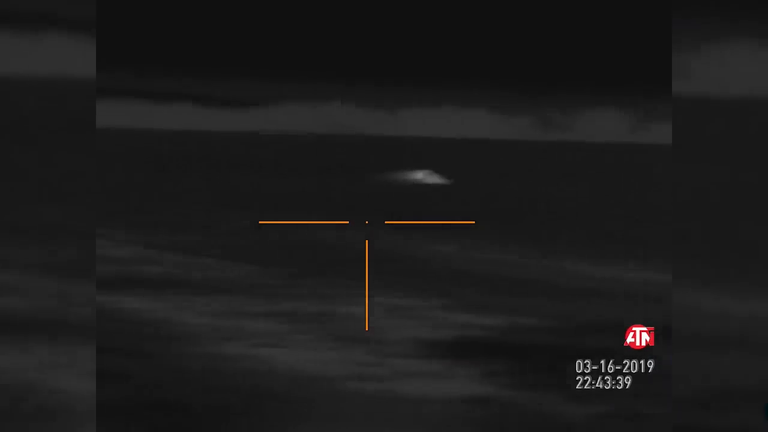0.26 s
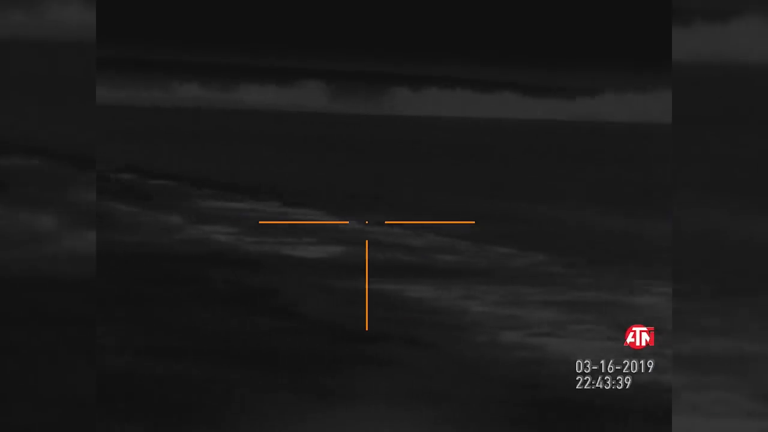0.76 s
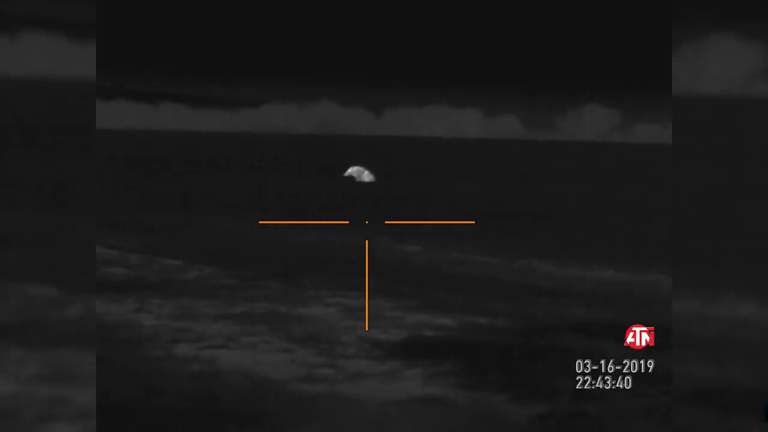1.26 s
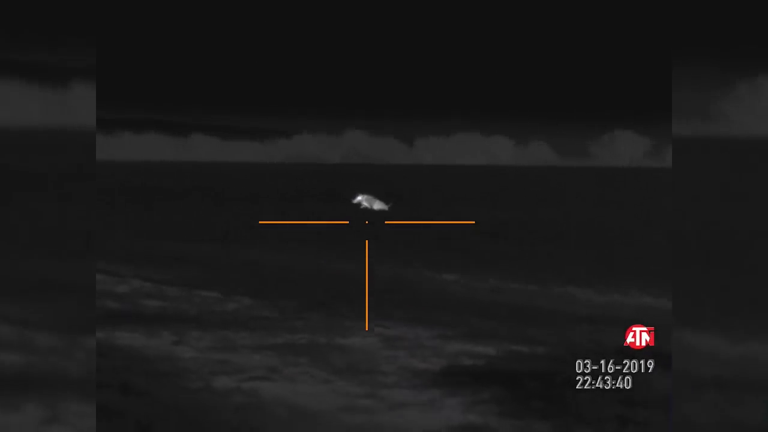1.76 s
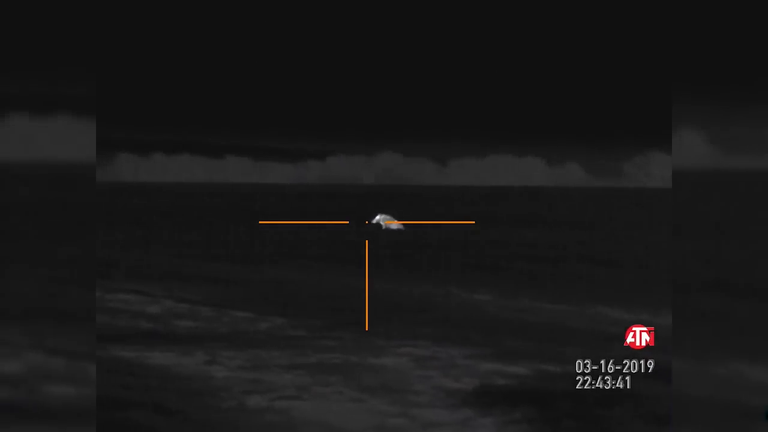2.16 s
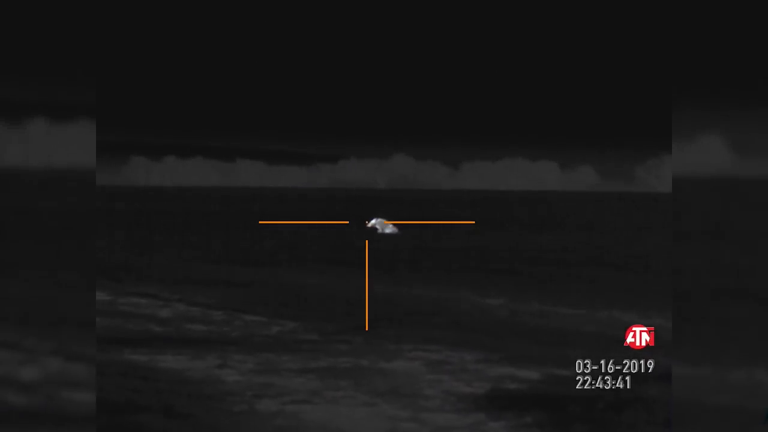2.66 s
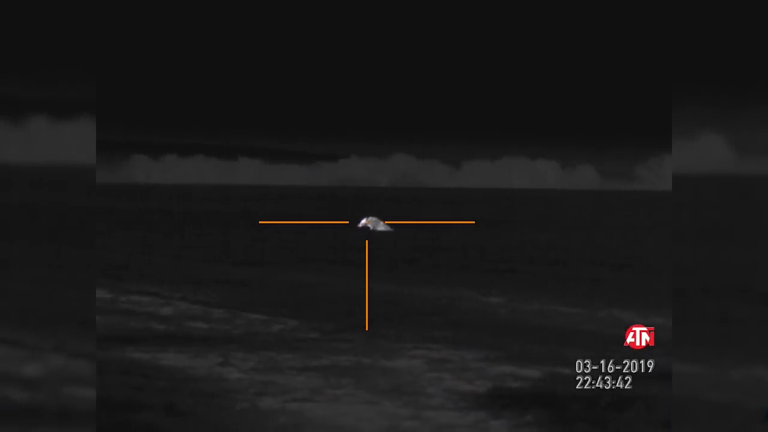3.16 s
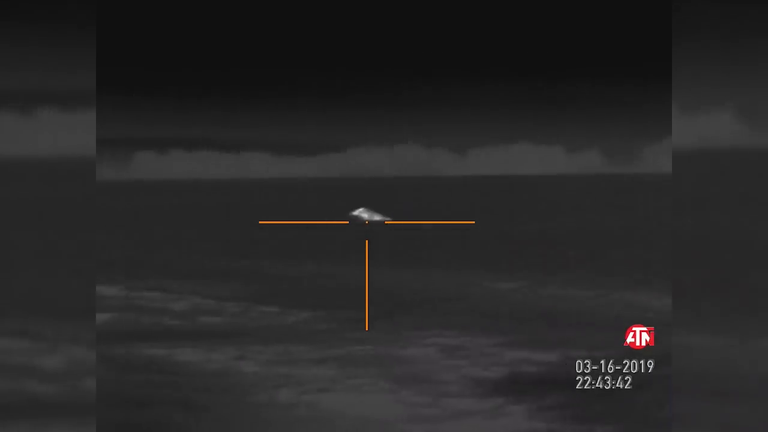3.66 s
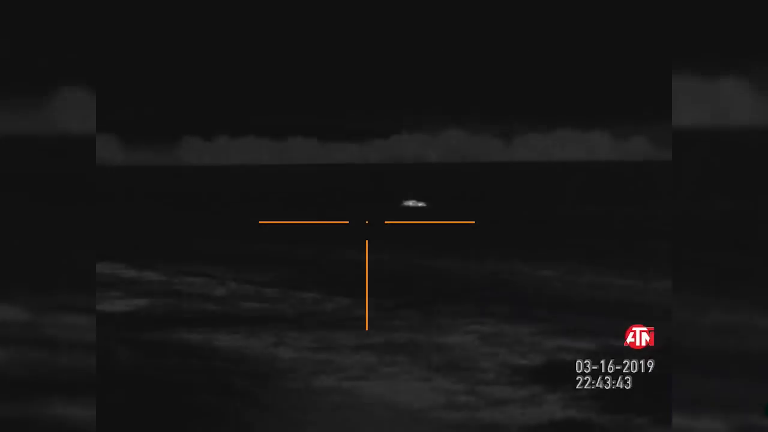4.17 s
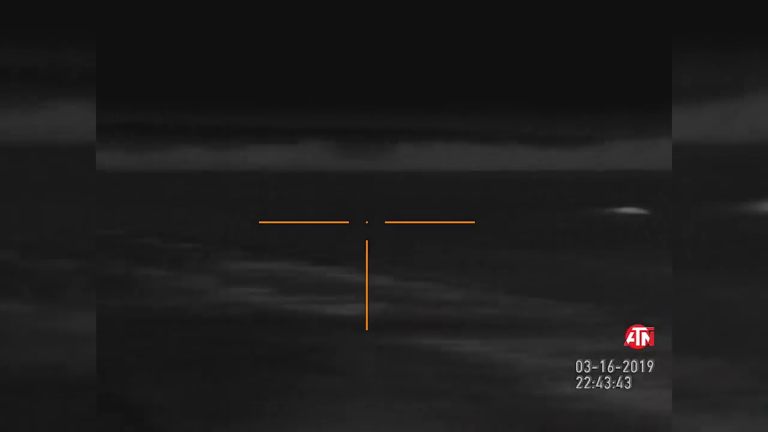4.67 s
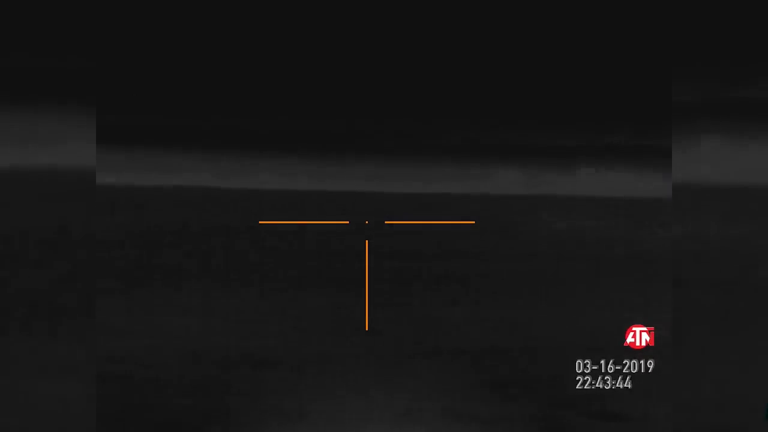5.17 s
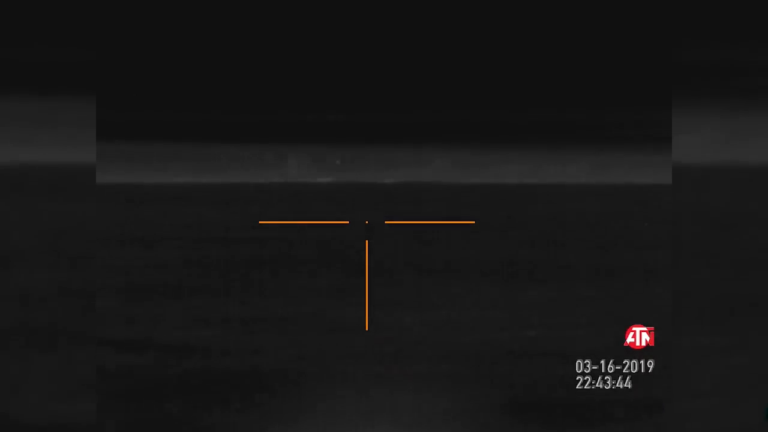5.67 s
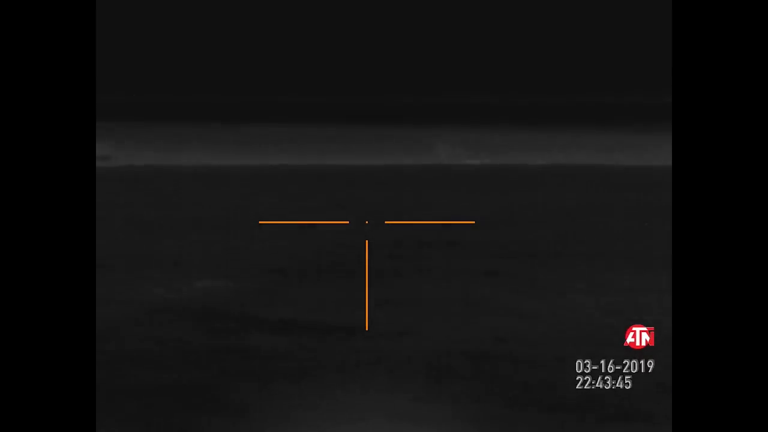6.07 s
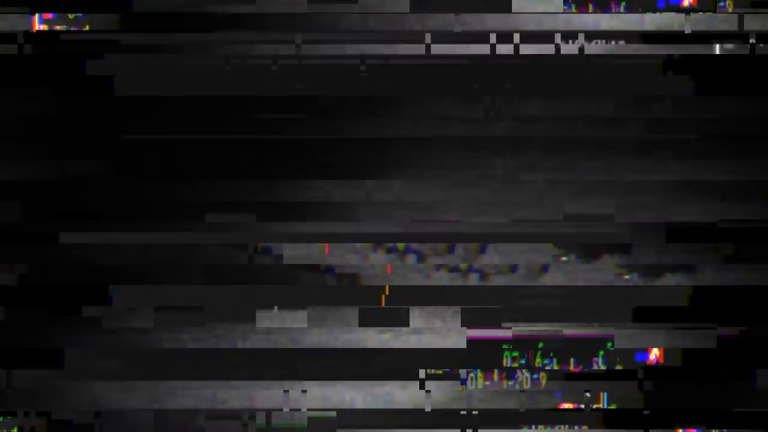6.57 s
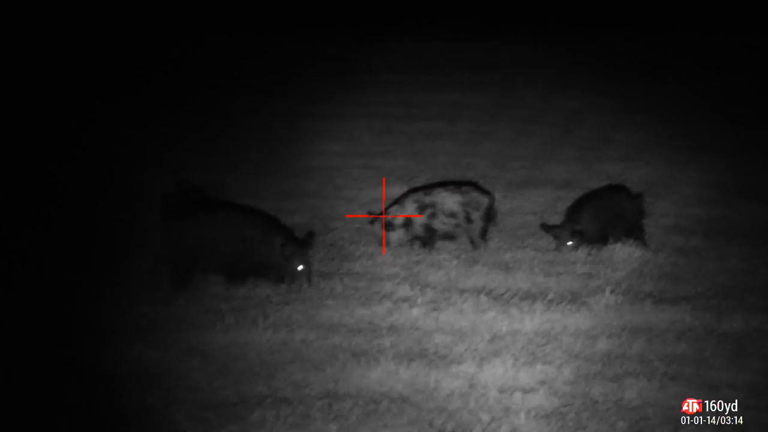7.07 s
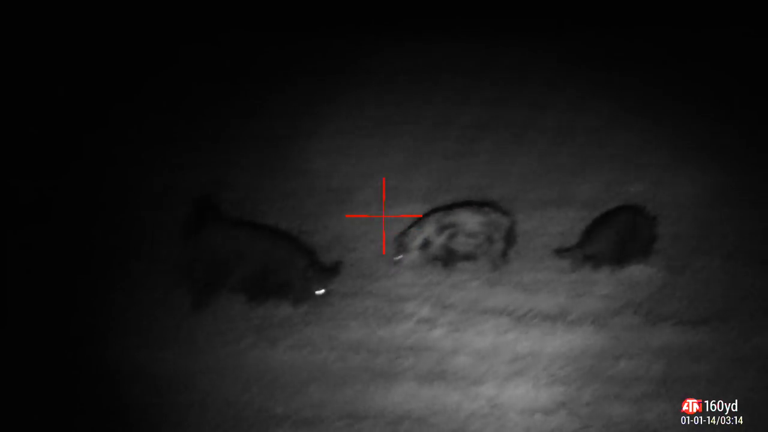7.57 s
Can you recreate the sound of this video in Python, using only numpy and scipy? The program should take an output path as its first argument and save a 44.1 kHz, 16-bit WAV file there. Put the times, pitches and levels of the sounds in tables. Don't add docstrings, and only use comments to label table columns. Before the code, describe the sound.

A small microphone on a rifle, quiet open fields at night, nearly mono. From 0 s there is low far hum, faint electronic whine and hiss, soft cloth and finger ticks, with a crisp tick at 0.6. At 2.0-2.12 the safety lever is taken up and snaps over, hard and metallic; another small tick at 3.13. At 3.43 the hammer falls and a suppressed blast overloads the input, very short, with bolt clatter slamming shut by 3.48 and unsteady ringing steel. A bright hissing scatter swells around 3.6 and sags until the bullet strikes at 3.82: sharp crack, dirt spray, small thud, then a tail growing dull to about 5. Handling ticks and cloth continue to 5.5. At 6.15, after a tiny gap, a hollow hard knock opens a much louder hum with thin high hiss, quick cloth brushes near 6.26, sharp ticks at 7.13 and 7.2, and softer contacts until 7.8.

```python
import sys
import numpy as np
from scipy import signal
from scipy.io import wavfile
from scipy.ndimage import uniform_filter1d

SR = 44100
rng = np.random.default_rng(int(sys.argv[2]) if len(sys.argv) > 2 else 0)


def makeup_ratio(level_db):
    decades = np.asarray(level_db, float) / 20
    return 10 ** decades


def to_wav(sig):
    pcm = np.clip(np.atleast_2d(sig), -1, 1) * 32767
    pcm = np.round(pcm).astype(np.int16)
    wavfile.write(sys.argv[1], SR, pcm.T)


N = 344871
TIME = np.arange(N) / SR
IMPACT_S, CRACK_S = 3.8165, .0003

# start in seconds, level in dB, t60 in seconds.
MUZZLE_BLAST = (3.4318, 26, .0175)


def rms_one(x):
    return x / np.sqrt(np.mean(x ** 2) + 1e-20)


def in_time(rows):
    s, *columns = np.transpose(rows)
    return [np.interp(TIME, s, c) for c in columns]


def drift(rate, size):
    r, steps = np.exp(-80 * np.pi * rate / SR), size // 40 + 2
    slow = signal.lfilter([1], [1, -2 * r, r * r], rng.standard_normal(steps + 2000))
    return np.interp(np.linspace(0, steps - 1, size), np.arange(steps), rms_one(slow)[-steps:])


def ring(x, hz, t60):
    r, w = makeup_ratio(-60 / (t60 * SR)), 2 * np.pi * hz / SR
    return signal.lfilter([0, np.sin(w)], [1, -2 * r * np.cos(w), r * r], x + 1e-18)


def dying(s, t60):
    return (TIME >= s) * makeup_ratio(-60 * np.maximum(TIME - s, 0) / t60)


def noise(spectrum, span, patchy_db, tilt_db=0):
    spans = {"first": (0, 6.14), "blast": (3.3, 3.6), "flight": (3.435, 3.9), "field": (3.7, 5.05),
             "second": (6.0, 7.83)}
    band_edges = 20 * 2 ** np.arange(0, 10, .5)
    hz_points, db_points = np.transpose(spectrum)
    start, stop = (min(round(s * SR), N) for s in spans[span])
    size = stop - start
    tilt_db = (tilt_db + np.zeros(N))[start:stop]
    total, together, white = 0, drift(34.0, size), rng.standard_normal((2, size))
    for k, (low, high) in enumerate(zip(band_edges, band_edges[1:])):
        hz = np.sqrt(low * high)
        level = np.interp(np.log(hz), np.log(hz_points), db_points, left=-90, right=-90)
        band = signal.sosfilt(signal.butter(2, [low, high], "band", fs=SR, output="sos"), white[k % 2])
        flicker_db = patchy_db * (0.58 * together + drift(26, size))
        sway_db = tilt_db * np.log2(hz / 4000) + flicker_db
        total = total + band * makeup_ratio(level + sway_db)
    evened = total / np.sqrt(uniform_filter1d(total ** 2, size=SR // 3))
    return np.pad(evened, (start, N - stop))


def strokes(events, rest_db, edge):
    s, db, fade = np.transpose(events)[:, :, None]
    age = (TIME - s) / fade
    shape = np.exp(-np.maximum(-age / 0.76, age) ** edge)
    return makeup_ratio(rest_db) + np.sum(makeup_ratio(db) * shape, axis=0)


def night(span, hum, hum_colour, brush, brush_colour, patchy_db):
    far = makeup_ratio(in_time(hum)[0]) * noise(hum_colour, span, patchy_db=-0.37)
    return far + brush * noise(brush_colour, span, patchy_db)


def tones(lines):
    return sum(makeup_ratio(db + 2.5) * np.sin(2 * np.pi * hz * TIME) for hz, db in lines)


def first_air():
    # time in seconds, level in dB.
    far_hum = [(0, -68.5), (.66, -66.5), (1.0, -69.5), (3.2, -70), (3.41, -68.5), (4.88, -70.5),
               (5.42, -69.5), (6.13, -74)]
    # pitch in Hz, level in dB per Hz.
    hum_colour = [(12, -46), (20, -15), (81, -10), (250, -6), (409, -5), (706, 0.27), (1220, -1.8),
                  (1500, -5.5), (1900, -22), (2400, -24.5), (3000, -23.5), (3900, -42)]
    # peak in seconds, level in dB, fade in seconds.
    cloth = [(.09, -75, 0.034), (.27, -70, 0.088), (.6, -70, 0.26), (1.55, -78, .05), (1.85, -72, .06),
             (2.08, -68.5, 0.093), (2.4, -77, 0.1), (3.4, -76, .4), (4.42, -71.5, .12), (4.62, -69.5, 0.14),
             (4.9, -64.5, 0.063), (5.15, -69.5, .15), (5.55, -71, 0.31)]
    # pitch in Hz, level in dB per Hz.
    cloth_colour = [(1500, -16.5), (2400, -7.5), (4000, -7), (6120, -5.5), (7500, -3), (11000, -10),
                    (15400, -15)]
    # pitch in Hz, level in dB.
    whine = [(81, -91.5), (122, -91), (721, -87), (1441, -84), (2160, -86.5), (2880, -90.5), (8258, -90),
             (10142, -92)]
    brush = strokes(cloth, rest_db=-86, edge=1.2)
    air = night("first", far_hum, hum_colour, brush, cloth_colour, patchy_db=1.8)
    return air + tones(whine) + makeup_ratio(-73) * rng.standard_normal(N)


def bumps():
    # start in seconds, level in dB, pitch in Hz.
    knocks = [
        (0.096, -62, 130),
        (4.916, -62, 110),
    ]
    return sum(makeup_ratio(db) * dying(s, 0.041) * np.sin(2 * np.pi * hz * (TIME - s)) for s, db, hz in knocks)


def contacts(events, modes, octaves, ring_db, thump_db, order):
    out, size = np.zeros(N + SR), SR // 10
    age = np.arange(size) / SR
    rise = np.clip(age / 0.0001, 0, 1)
    jolt = makeup_ratio(thump_db) * np.sin(np.pi * np.clip(age / 0.00036, 0, 1))
    for s, peak_db, hz, t60 in events:
        burst = rng.standard_normal(size) * rise * makeup_ratio(-68 * age / t60)
        strength = rng.normal(0, 2.5, len(modes))
        edges = np.clip(hz * 2 ** (octaves * np.array([-.5, .5])), 100, 19000)
        snap = signal.lfilter(*signal.butter(order, edges, "band", fs=SR), burst)
        snap = signal.lfilter(*signal.butter(1, edges[0] / 4, "high", fs=SR), snap)
        body = sum(makeup_ratio(db + g) * ring(snap, f, d) * f / 8000 for (f, db, d), g in zip(modes, strength))
        touch, at = snap + makeup_ratio(ring_db - 9.5) * body, round(s * SR)
        out[at:at + size] += makeup_ratio(peak_db) * (touch / np.abs(touch).max() + jolt)
    return out[:N]


def gun():
    # start in seconds, peak in dB, pitch in Hz, t60 in seconds.
    fidgets = [(.215, -52, 6500, .012), (.229, -53, 5500, .009), (.258, -55, 9000, .01),
               (.279, -62, 8100, .01), (.29, -49, 1200, .013), (.357, -51, 900, .01), (.7, -51, 1700, .015),
               (2.272, -50.5, 1970, 0.063), (4.0609, -48.5, 4600, 0.017), (4.615, -48.5, 1970, 0.22),
               (4.7499, -48, 3210, .02), (4.861, -51.5, 2300, 0.011), (4.9629, -50.5, 3980, 0.027),
               (4.97, -46, 1467, 0.014), (5.0487, -51, 5000, 0.0081)]
    # start in seconds, peak in dB, pitch in Hz, t60 in seconds.
    ticks = [(.5842, -29, 7760, 0.0094), (.59, -43, 8020, 0.034), (3.1346, -27, 8800, .0042),
             (3.5408, -18, 2950, 0.011), (4.2177, -44.5, 4060, .013), (4.3514, -40.5, 1890, 0.011),
             (4.57, -61, 4100, .012), (4.9761, -41, 5350, 0.00677), (5.1637, -30.5, 5650, 0.0072),
             (5.1931, -30.5, 5460, 0.0071), (5.2583, -54, 5860, .019), (5.4612, -31.5, 6100, 0.006)]
    # start in seconds, peak in dB, pitch in Hz, t60 in seconds.
    safety = [(2.0151, -35.5, 4900, .016), (2.0169, -41, 5030, 0.01), (2.0331, -49.5, 3270, 0.0081),
              (2.0924, -25.5, 6100, 0.0048), (2.1025, -30.5, 5195, 0.0091), (2.1079, -22.5, 5000, .02),
              (2.1091, -31.5, 4130, 0.055), (2.1172, -7.5, 7500, 0.0098), (2.1248, -11.5, 5600, 0.011),
              (2.2943, -38, 3700, 0.019), (2.5793, -50, 5250, 0.009), (4.6732, -44, 3900, 0.014),
              (4.6798, -32.5, 4500, 0.025)]
    # start in seconds, peak in dB, pitch in Hz, t60 in seconds.
    action = [
        (3.4276, -11.5, 3278, .015),
        (3.443, -10, 7750, 0.019),
        (3.4478, -4.5, 3460, .025),
        (3.4553, -9.5, 5220, .015),
        (3.470, -16, 4106, .03),
        (3.4785, -13.5, 4948, .07),
        (3.4815, -1.5, 4079, 0.025),
    ]
    # start in seconds, peak in dB, pitch in Hz, t60 in seconds.
    pings = [
        (3.4287, -2, 2400, .06),
        (3.4835, -14.5, 5500, .03),
        (3.494, -24.5, 2400, .015),
    ]
    # pitch in Hz, level in dB, t60 in seconds.
    receiver = [(2400, -11, 0.07), (4090, -5.7, 0.0029), (5500, -12, .011), (6960, -6.5, 0.008),
                (10800, -13.5, 0.0034)]
    # pitch in Hz, level in dB, t60 in seconds.
    lever = [(1100, -1, .012), (2400, -10, .025), (2360, -32, .13), (4010, -0.5, .012),
             (3900, -37.5, 0.094), (6100, -2, 0.0038), (9300, -10.5, .005)]
    return (contacts(fidgets, receiver, octaves=1.2, ring_db=-28, thump_db=-21.0, order=1)
            + contacts(ticks, receiver, octaves=0.93, ring_db=-24.5, thump_db=-26.5, order=1)
            + contacts(safety, lever, octaves=1.0, ring_db=-4, thump_db=-25.5, order=1)
            + contacts(action, receiver, octaves=3.3, ring_db=-11, thump_db=-21.0, order=1)
            + contacts(pings, receiver, octaves=0.1, ring_db=-11, thump_db=-21.5, order=1))


def blast():
    # pitch in Hz, level in dB per Hz.
    gas_colour = [(24, -45.5), (60, -21.5), (170, -35), (534, -13), (1000, -4), (2100, -6.5), (3050, -8.5),
                  (4200, -4.5), (8270, -4.5), (15400, -14.5)]
    # pitch in Hz, level in dB, t60 in seconds, wobble per second.
    steel = [(3208, -61.5, 5, 70), (2440, -34.5, .8, 250), (3950, -37, .6, 200)]
    s, level_db, t60 = MUZZLE_BLAST
    out = makeup_ratio(level_db) * dying(s, t60) * noise(gas_colour, "blast", patchy_db=4.0)
    for hz, ring_db, ring_t60, wobble in steel:
        level = makeup_ratio(ring_db + 3.5 * drift(wobble / 2, N))
        tone = np.sin(2 * np.pi * hz * TIME + 1.8 * drift(wobble, N))
        out += dying(s, ring_t60) * level * tone
    return out


def scatter():
    # pitch in Hz, level in dB per Hz.
    crack_colour = [(60, -43.5), (218, -29), (437, -27.5), (725, -18.5), (1360, -18), (2570, -5),
                    (4300, -2), (6000, 5), (8000, -11.5), (11000, -13), (15400, -15.5)]
    # time in seconds, lag in seconds.
    ground_lag = [(3.6, .00075), (3.82, .00092)]
    full_s, level_db, rise_s, minus_rise_db_per_s = 3.63, -27.5, 0.032, -8
    swell = np.exp(-(np.minimum(TIME - full_s, 0) / rise_s) ** 2)
    flight_level = makeup_ratio(level_db - minus_rise_db_per_s * np.maximum(TIME - full_s, 0))
    until_strike = np.clip((IMPACT_S + 0.0054 - TIME) / .008, 0, 1)
    hiss = noise(crack_colour, "flight", patchy_db=1.3)
    dull = signal.sosfilt(signal.butter(8, 8900, fs=SR, output="sos"), hiss)
    hiss = dull + 0.29 * (hiss - dull)
    bounce = np.interp(TIME, [3.6, 3.68], [0, .4])
    by_ground = np.interp(TIME - in_time(ground_lag)[0], TIME, hiss)
    return swell * flight_level * until_strike * (hiss + bounce * by_ground)


def field():
    # level in dB, t60 in seconds.
    muzzle_echo = (-36.5, 1.2)
    # pitch in Hz, level in dB per Hz.
    echo_colour = [(60, -32), (300, -17.5), (1000, -10), (2500, -4), (6000, 0.5), (10000, -3), (17500, -7)]
    # level in dB, t60 in seconds.
    tails = [
        (-43.5, 0.76),
        (-57, 4.2),
    ]
    # pitch in Hz, level in dB per Hz.
    tail_colour = [(35, -62), (60, -29), (753, -16), (1020, -10.5), (1700, -8.5), (2040, -3.5), (2960, -3),
                   (5420, 0), (15400, -27)]
    echo_db, echo_t60 = muzzle_echo
    echo = makeup_ratio(echo_db) * dying(MUZZLE_BLAST[0], echo_t60) * noise(echo_colour, "flight", patchy_db=1.3)
    echo *= np.clip((IMPACT_S + .06 - TIME) / .06, 0, 1)
    dull_db, dulling_s = -4.0, 0.147
    tilt_db = dull_db * (1 - np.exp(-np.maximum(TIME - IMPACT_S, 0) / dulling_s))
    gain = sum(makeup_ratio(db) * dying(IMPACT_S, t60) for db, t60 in tails)
    return echo + gain * noise(tail_colour, "field", patchy_db=1.0, tilt_db=tilt_db)


def impact():
    strike_levels = (-5.5, -14.5, -30.5)
    crack_db, spray_db, thud_db = strike_levels
    phase = (TIME - IMPACT_S) / CRACK_S
    pulse = (1 - 2 * phase) * (phase >= 0) * (phase < 1)
    crack = signal.lfilter(*signal.butter(2, [1200, 6500], "band", fs=SR), pulse + 1e-18)
    spray = signal.lfilter(*signal.butter(3, [2500, 8500], "band", fs=SR), rng.standard_normal(N))
    spray = dying(IMPACT_S + CRACK_S, 0.025) * spray
    push = dying(IMPACT_S, 0.039) * rng.standard_normal(N)
    thud = signal.sosfilt(signal.butter(2, [140, 430], "band", fs=SR, output="sos"), push + 1e-18)
    return makeup_ratio(crack_db) * crack + makeup_ratio(spray_db) * spray + makeup_ratio(thud_db) * thud / np.abs(thud).max()


def late_air():
    # time in seconds, level in dB.
    far_hum = [(6.15, -52.5), (6.2, -42), (6.6, -43), (7.15, -42), (7.82, -42)]
    # pitch in Hz, level in dB per Hz.
    hum_colour = [(53, -51), (90, -24), (150, -21), (212, -36), (268, -16), (394, -7), (468, -1.5),
                  (733, -1.5), (908, 2), (3010, -22), (4520, -27), (10500, -33.5), (13000, -33.5),
                  (17500, -26)]
    # peak in seconds, level in dB, fade in seconds.
    cloth = [(6.22, -50, 0.022), (6.258, -35.5, 0.0075), (6.279, -39, 0.0081), (6.3, -54, 0.011),
             (6.64, -59, .09), (7.35, -48, 0.026), (7.45, -44, 0.038), (7.77, -54.5, .04)]
    # pitch in Hz, level in dB per Hz.
    cloth_colour = [(1470, -35), (2500, 7.5), (2890, -53), (4140, 0), (6690, -18.5), (8150, -27.5),
                    (12000, -32), (15600, -60), (22000, -120)]
    # pitch in Hz, level in dB.
    drone = [(81.2, -70), (129.8, -71.5), (179.8, -72), (210, -70.5), (240, -73.5)]
    brush = strokes(cloth, rest_db=-61, edge=1.66)
    air = night("second", far_hum, hum_colour, brush, cloth_colour, patchy_db=3.0) + tones(drone)
    hiss = signal.lfilter(*signal.butter(2, [13000, 15600], "band", fs=SR), rng.standard_normal(N))
    return air + makeup_ratio(-72) * rms_one(hiss)


def late_contacts():
    # start in seconds, then its modes, each with pitch in Hz, level in dB, t60 in seconds.
    hollow_knock = (6.1522, [(496, -23, 0.025), (1306, -9.5, 0.0045)])
    # start in seconds, peak in dB, pitch in Hz, t60 in seconds.
    late_ticks = [(6.1519, -7.5, 4760, 0.0072), (6.1894, -37, 6300, 0.0083), (6.2102, -36, 4400, 0.017),
                  (6.2526, -36.5, 3230, 0.018), (6.6374, -35, 3900, .01), (7.1278, -15, 4500, 0.0036),
                  (7.1962, -16, 4320, .008), (7.365, -33.5, 4050, 0.021), (7.7632, -33.5, 4320, 0.021)]
    # pitch in Hz, level in dB, t60 in seconds.
    scope = [(4500, -27.5, 0.0063), (5100, -5.5, 0.0055)]
    s, modes = hollow_knock
    knock = sum(makeup_ratio(db) * dying(s, t60) * np.sin(2 * np.pi * hz * (TIME - s)) for hz, db, t60 in modes)
    knock = signal.lfilter(*signal.butter(4, 240, "high", fs=SR), knock + 1e-18)
    return knock + contacts(late_ticks, scope, octaves=0.673, ring_db=-7.5, thump_db=-55, order=2)


def scene():
    cut_s, resume_s = 6.138, 6.148
    first = first_air() + bumps() + gun() + blast() + scatter() + field() + impact()
    second = late_air() * np.clip((TIME - resume_s) / 0.0015, 0, 1) + late_contacts()
    second = signal.sosfilt(signal.butter(4, 72, "high", fs=SR, output="sos"), second)
    second = signal.sosfilt(signal.cheby2(12, 30, 15700, fs=SR, output="sos"), second)
    overloaded = np.clip(first, -1, 1)
    mono = overloaded * (TIME < cut_s) + second * (TIME > resume_s)
    return np.array([mono, mono])


def band_limit(x):
    return signal.sosfilt(signal.butter(12, 15560, fs=SR, output="sos"), x)


def record(dry):
    top = signal.sosfilt(signal.cheby2(10, 40, 16200, fs=SR, output="sos"), dry)
    loudness = np.sqrt(uniform_filter1d(top[0] ** 2, size=512) + 1e-14)
    grit = makeup_ratio(-40) * loudness * rng.standard_normal(N)
    bass = signal.lfilter(*signal.butter(1, 300, fs=SR), top[0])
    grit += makeup_ratio(-30.5) * drift(30, N) * bass
    return band_limit(np.clip(top + grit * [[1], [-1]], -1, 1))


dry = scene()
out = record(dry)
to_wav(out)
```